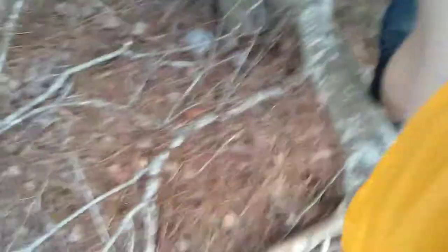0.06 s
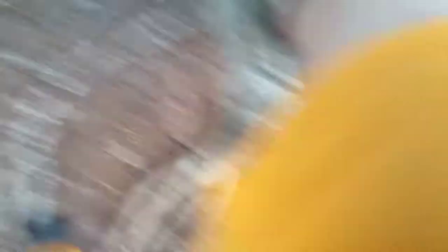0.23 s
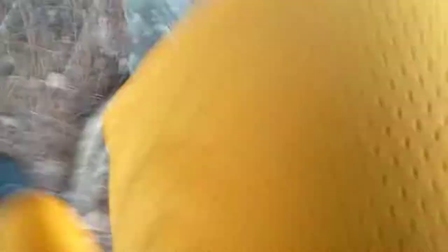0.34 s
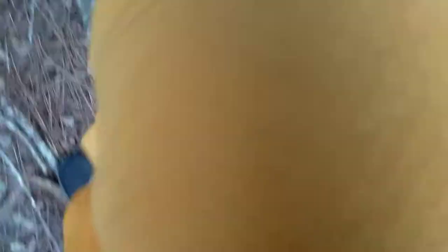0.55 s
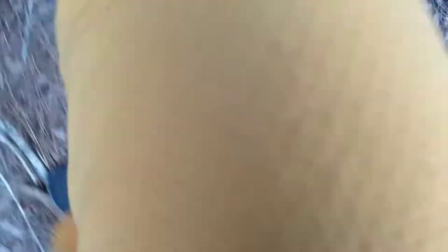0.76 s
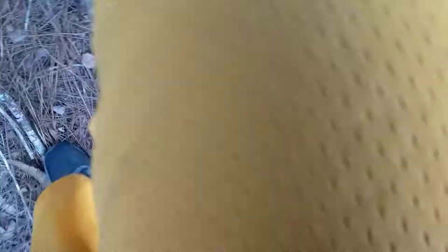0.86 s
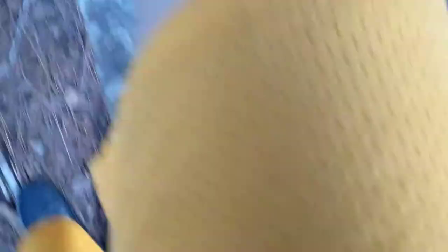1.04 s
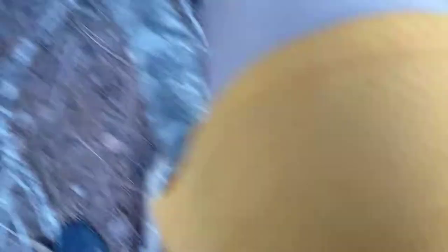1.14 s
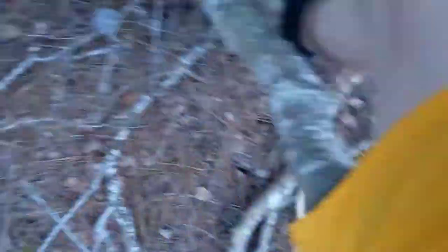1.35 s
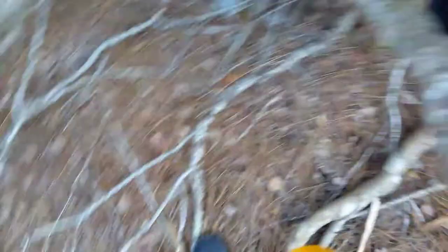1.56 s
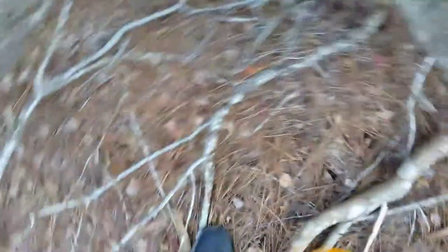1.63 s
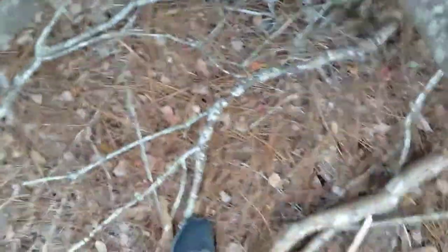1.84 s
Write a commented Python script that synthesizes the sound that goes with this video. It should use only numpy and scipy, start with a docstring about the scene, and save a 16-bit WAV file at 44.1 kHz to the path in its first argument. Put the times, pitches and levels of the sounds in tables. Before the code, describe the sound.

A dry branch is struck very close to the microphone outdoors: a brief swish, a low knock and a dense burst of sharp splintering cracks, then scattered snaps, pattering bits and faint ticks over near silence.

```python
"""Outdoors, on dry needles, a dry branch is struck and splinters close to a small microphone.
It swishes (noise in a gliding resonance), thumps (pushes ringing low resonances) and cracks (noise
bursts with a sharp front). Twigs snap and tick (damped sines) and bits patter (grains over hiss).
Far rumble and rubbing clothing (coloured noise) and a faint hum (a wavering sine) lie below."""
import sys
import numpy as np
from scipy import signal
from scipy.fft import rfft, irfft, next_fast_len
from scipy.io import wavfile
from scipy.ndimage import map_coordinates

SR = 44100
rng = np.random.default_rng(int(sys.argv[2]) if len(sys.argv) > 2 else 0)


def nominal_scale(level):
    """Amplitude ratio for a level in decibels (scalar or array-like)."""
    x = np.asarray(level, float) / 20
    return 10 ** x


def to_wav(s):
    """Save 16-bit WAV."""
    ch = np.atleast_2d(s).T  # columns
    pcm = np.round(np.clip(ch, -1, 1) * 32767)  # PCM
    wavfile.write(sys.argv[1], SR, pcm.astype(np.int16))


N = 83790
T = np.arange(N) / SR


def unit(x):
    """Scaled to rms 1."""
    return x / np.sqrt(np.mean(x ** 2) + 1e-20)


def curve(rows):
    """Straight lines through (seconds, value) rows, one value per sample."""
    return np.interp(T, *np.transpose(rows))


def wobble(rate):
    """A smooth random curve with rate knots a second."""
    knots = rng.standard_normal(int(N * rate / SR) + 4)
    return map_coordinates(knots, [T * rate])


def filtered(x, response):
    """x through a filter given as a complex response of frequency in Hz."""
    size = next_fast_len(N + SR // 2)
    spectrum = rfft(x, size) * response(np.fft.rfftfreq(size, 1 / SR))
    return irfft(spectrum, size)[:N]


def colour(x, points):
    """Minimum-phase filter shaped by (Hz, dB) points, keeping the rms of white noise."""
    size = 2 ** 12
    hz, db = np.transpose(points)
    bins_hz = np.fft.rfftfreq(size, 1 / SR)
    gain = nominal_scale(np.interp(np.log(bins_hz + 1), np.log(hz), db)) + 1e-5
    # folding the cepstrum onto positive times makes the filter causal
    cepstrum = irfft(np.log(gain))
    cepstrum[1:size // 2] *= 2
    cepstrum[size // 2 + 1:] = 0
    pulse = irfft(np.exp(rfft(cepstrum)))
    return signal.fftconvolve(x, pulse / np.linalg.norm(pulse))[:N]


def ring(rows):
    """Damped sines, rising in one cycle, from rows of seconds, level in dB, Hz, t60 in seconds."""
    start, db, hz, t60 = np.transpose(rows)[:, :, None]
    k = np.arange(SR // 20)
    t = k / SR
    wave = nominal_scale(db - 60 * t / t60) * np.sin(2 * np.pi * hz * t) * np.minimum(hz * t, 1)
    place = np.round(start * SR).astype(int) + k
    return np.bincount(place.ravel(), wave.ravel(), N + SR)[:N]


def snaps():
    """Breaking wood: a sharp front, a noise burst and a splintering tail, bright and woody in parallel."""
    # Snaps of wood fibres and twigs. Each row: start in seconds, nominal peak in dB,
    # woody part over the bright part in dB before its fixed lift, woody pitch in Hz, t60 in seconds.
    snap_rows = [(0.2241, -6.5, -5.5, 4700, 0.038), (0.2305, -6, 1, 1800, 0.014),
                 (0.2365, -12, -14.5, 2940, 0.038), (0.2438, -0.5, -0.5, 2800, 0.0086),
                 (0.2499, -14.5, -2, 2800, 0.037), (0.2552, -9, -10.5, 4270, 0.025),
                 (0.264, -4.5, -1, 1740, 0.017), (0.2715, -8, -20, 3563, 0.026),
                 (0.2838, -2, -24.5, 4644, 0.0084), (0.2892, 1, -7, 3165, 0.0066),
                 (0.2913, -8, -4.5, 3000, 0.035), (0.2975, -3, -10, 4980, 0.012),
                 (0.3109, -10, -2, 2830, 0.019), (0.316, 1, -21, 3260, 0.01), (0.3333, 5, -7, 5600, 0.005),
                 (0.3372, -7, 2, 5500, 0.0069), (0.3498, -3.5, -14, 5224, 0.012),
                 (0.3719, 0, -7.5, 5604, 0.0036), (0.374, -22, 2.5, 2500, 0.029),
                 (0.4568, -5.5, -12, 3930, 0.0066), (0.4667, -16.5, -10.5, 4000, 0.024),
                 (0.5032, -25.5, -10, 2000, 0.021), (0.5503, -31.5, -7.5, 5000, 0.044),
                 (0.5643, -35, 2, 3500, 0.02), (0.5729, -27, -8.5, 3840, 0.028),
                 (0.6116, -21, 8.5, 4320, 0.0077), (0.6125, -23, -1.5, 2000, 0.024),
                 (0.6225, -21, 3.5, 4340, 0.0098), (0.7097, -19.5, -14.5, 4900, 0.016),
                 (0.7163, -16.5, -18, 2000, 0.016), (0.7208, -25.5, -9, 3200, 0.045),
                 (0.7413, -25, -9.5, 4800, 0.026), (0.7445, -26.5, -0.5, 5320, 0.0056),
                 (0.8246, -32.5, -9, 4020, 0.025), (0.869, -11.5, -17, 5160, 0.0046),
                 (0.8987, -32.5, -12, 5010, 0.033), (0.9144, -22, -17, 5160, 0.0058),
                 (0.9837, -37.5, -9, 4420, 0.012), (1.147, -34.5, -23, 5980, 0.032),
                 (1.222, -48, 4, 5480, 0.0098), (1.379, -40.5, -13, 2200, 0.042),
                 (1.4225, -39.5, -2, 2766, 0.014), (1.4984, -39.5, -15.5, 5055, 0.034),
                 (1.5288, -37, -20, 5570, 0.028)]
    # Colour of the bright part. Each row: frequency in Hz, relative gain in dB.
    bright_colour = [(2000, -51), (3500, -37.5), (5500, -13.5), (7800, -9.5), (9490, 4.5), (10400, -1.5),
                     (13000, -0.5), (15200, -6.5), (15500, -15.5), (15900, -36)]
    attack_s, tail_attack_s, tail_t60_s = 0.0004, 0.006, 0.22
    tail_db, tail_ref_s = -7.5, 0.062  # tail level after a snap of this t60; shorter snaps leave less
    crest_db, woody_lift_db = 4.5, 1.0  # nominal peak over the bright burst; added to every woody part
    front, sharp_s = 1.5, 0.007  # size of the first break; snaps with a longer t60 start softer
    wood_width_hz = 6850  # bandwidth of each of the two passes of the woody resonance
    t = np.arange(SR // 5) / SR
    bright, woody = np.zeros(N + SR), np.zeros(N + SR)
    for start, db, woody_db, hz, t60 in snap_rows:
        burst = (1 - np.exp(-t / attack_s)) * nominal_scale(-60 * t / max(t60, .003))
        decay_db = tail_db + 20 * np.log10(t60 / tail_ref_s) - 60 * t / tail_t60_s
        tail = nominal_scale(decay_db) * (1 - np.exp(-t / tail_attack_s))
        noise = rng.standard_normal((2, len(t)))
        # every random burst gets the energy of its envelope
        even = np.linalg.norm(burst) / np.linalg.norm(burst * noise, axis=1)[:, None]
        spikes = noise * (burst * even + tail)
        spikes[:, 0] = -front * min(1, sharp_s / t60)
        b, a = signal.iirpeak(hz, hz / wood_width_hz, SR)
        resonant = signal.lfilter(b, a, signal.lfilter(b, a, spikes[1]))
        here = slice(round(start * SR), round(start * SR) + len(t))
        bright[here] += nominal_scale(db - crest_db) * spikes[0]
        woody[here] += nominal_scale(db + woody_db + woody_lift_db) * resonant
    return colour(bright, bright_colour) + woody[:N]


def ticks():
    """Single fibres, twigs and needles tick as short damped sines."""
    # Each row: start in seconds, nominal peak in dB, pitch in Hz, t60 in seconds.
    tick_rows = [(.1281, -32, 9290, 0.0028), (.1815, -36, 9060, 0.0027), (.2662, -7, 13000, 0.0027),
                 (.4028, -18.5, 14520, .01), (.6128, -24.5, 2795, 0.011), (.9607, -44.5, 3160, 0.0037),
                 (1.211, -53.5, 3610, 0.026), (1.379, -60.5, 1600, 0.072), (1.384, -63, 1111, 0.073),
                 (1.424, -53, 900, 0.021), (1.5288, -30.5, 7860, 0.0046), (1.5476, -42, 11880, .002),
                 (1.5862, -35, 9880, 0.002005), (1.6063, -40, 10040, .002), (1.729, -44, 7890, 0.0029),
                 (1.7955, -39, 8570, 0.00197)]
    return ring(tick_rows)


def thumps():
    """The branch knocks the ground and the stump: rounded pushes ring its broad low resonances."""
    # Each row: start in seconds, height of the push in dB, time from start to full push in seconds.
    knocks = [(0.2277, -8, 0.00046), (0.23, -10, 0.0015), (0.2355, -6.5, 0.00085), (0.2428, -2, 0.00058),
              (0.2489, -5.5, 0.0008), (0.264, -8.5, 0.00071), (0.27, -10, 0.0028), (0.2903, -5, 0.00082),
              (0.2966, -7, .0005), (.315, -14, .0003), (0.379, -20.5, 0.00014)]
    # Resonances of the branch. Each row: centre in Hz, width in Hz, gain at the centre in dB.
    modes = [(81.6, 19, 4), (127, 34, -4), (205, 59, -13), (312, 250, -8), (424, 82, -4), (578, 130, -5),
             (817, 99, 1.5), (1010, 270, 0), (1407, 160, -4.5)]
    push = sum(nominal_scale(db) * np.exp(-((T - start - rise) / rise) ** 2 * 2) for start, db, rise in knocks)

    def branch(f):
        """Sum of band-pass resonances, turned over in sign."""
        return -sum(nominal_scale(db) * 1j * f * width / (hz * hz - f * f + 1j * f * width)
                    for hz, width, db in modes)

    return filtered(push, branch)


def swishes():
    """Air whistles round moving wood: noise in a gliding resonance that swells and fades."""
    # Each row: start in seconds, length in seconds, level in dB before the swell,
    # first pitch in Hz, last pitch in Hz, width in Hz.
    swish_rows = [(.17, .075, -42, 600, 1150, 300), (1.575, .08, -64, 2080, 1800, 400)]
    out = np.zeros(N)
    for start, length, db, from_hz, to_hz, width in swish_rows:
        progress = np.clip((T - start) / length, 0, 1)
        pole = [1, -np.exp(-np.pi * width / SR)]
        slow = signal.lfilter([1], np.convolve(pole, pole), rng.standard_normal((2, N)))
        phase = 2 * np.pi * np.cumsum(from_hz + (to_hz - from_hz) * progress) / SR
        whistle = unit(slow[0] * np.sin(phase) + slow[1] * np.cos(phase))
        out += nominal_scale(db) * np.sin(np.pi * progress ** 1.5) ** 2 * whistle
    return out


def patter_level():
    """Amplitude of the falling bits: a drifting base with short decaying showers added."""
    # Bits on dry needles. Each row: time in seconds, level in dB.
    base = [(0, -52), (.03, -69), (.16, -58.5), (.22, -42), (.39, -41), (.44, -56.5), (.7, -78.5),
            (1.0, -60), (1.3, -69.5), (1.66, -68.5), (1.72, -70), (1.9, -53)]
    # Showers of bits on top. Each row: start in seconds, level in dB before the attack, t60 in seconds.
    showers = [(0.085, -59, 0.31), (0.45, -22, 0.11), (0.535, -35, 0.067), (0.673, -48, 0.092),
               (0.78, -43, 0.15), (.93, -54.5, 0.19), (1.033, -47, 0.22), (1.133, -54.5, 0.11),
               (1.192, -55.5, 0.14), (1.36, -59.5, 0.19), (1.594, -56, 0.12), (1.723, -58, 0.34)]
    attack_s = 0.0025
    level = nominal_scale(curve(base))
    for start, db, t60 in showers:
        t = np.maximum(T - start, 0)
        level = level + (1 - np.exp(-t / attack_s)) * nominal_scale(db - 60 * t / t60)
    return level


def stray_ticks():
    """Chance ticks as damped sines, spread over an octave of pitch."""
    per_s, middle_hz, t60_cycles = 220, 10000, 22
    least_db, spread_db = 1.5, 12  # relative to the patter; most ticks lie near the least
    when, pitch, size = rng.random((round(per_s * N / SR), 3)).T
    hz = middle_hz * 2 ** (pitch - .5)
    return ring(np.c_[when * N / SR, least_db + spread_db * size ** 2, hz, t60_cycles / hz])


def patter():
    """Bits land on dry needles: dense tiny grains over hiss, in clumps and showers, with stray ticks."""
    # Colour of the needles. Each row: frequency in Hz, relative gain in dB.
    needle_colour = [(500, -27.5), (1100, -19), (2480, -21.5), (3360, -23), (4920, -14.5), (7800, -12.5),
                     (9500, 0), (11000, -7.5), (14900, -9.5), (15500, -25), (15900, -43.5)]
    # Gain of the top treble. Each row: time in seconds, gain in dB.
    sparkle = [(1.4, 1), (1.8, -9.5)]
    grains_per_s, grain_spread_db = 3500, 3.5
    hiss_share = .55  # of amplitude; the grains make up the rest
    hits = (rng.random(N) < grains_per_s / SR) * rng.standard_normal(N)
    grains = hits * nominal_scale(grain_spread_db * np.minimum(rng.exponential(size=N), 4))
    mixed = hiss_share * rng.standard_normal(N) + (1 - hiss_share) * unit(grains)
    bed = colour(unit(mixed), needle_colour)
    # fades in from 10.5 to 12.5 kHz
    top = filtered(bed, lambda hz: np.clip((hz - 10500) / 2000, 0, 1))
    level = patter_level()
    stray = stray_ticks()
    clumps = nominal_scale(1.5 * wobble(40) + 1.5 * wobble(200))
    return level * (clumps * (bed + (nominal_scale(curve(sparkle)) - 1) * top) + stray)


def clothing():
    """Clothing rubs: low coloured noise with a fluttering level."""
    # Each row: time in seconds, level in dB before the flutter.
    rub_level = [(0, -73.5), (.15, -71.5), (.35, -49.5), (.46, -63.5), (.57, -51.5), (.62, -71), (.8, -86),
                 (1.64, -82), (1.7, -73), (1.735, -54.5), (1.79, -61), (1.86, -62.5), (1.9, -60)]
    # Each row: frequency in Hz, relative gain in dB.
    rub_colour = [(100, -30), (200, -8), (320, -2), (450, 0), (600, -7), (900, -20), (1500, -34),
                  (2500, -60)]
    return nominal_scale(curve(rub_level) + 2 * wobble(60)) * unit(colour(rng.standard_normal(N), rub_colour))


def rumble():
    """Rumble from far off: deep coloured noise with a slowly wandering level."""
    # Each row: time in seconds, level in dB before the wander.
    rumble_level = [(0, -57), (.2, -58.5), (.45, -63), (.8, -71.5), (1.35, -74.5), (1.55, -64.5),
                    (1.9, -60.5)]
    # Each row: frequency in Hz, relative gain in dB.
    far_colour = [(12, -68), (20, -40), (54, -6), (90, -3), (114, 0), (384, -28), (721, -23.5),
                  (947, -23.5), (1380, -26), (3000, -40.5), (3900, -50), (6600, -120)]
    return nominal_scale(curve(rumble_level) + 1.5 * wobble(5.8)) * unit(colour(rng.standard_normal(N), far_colour))


def hum():
    """A faint sine whose level and phase waver."""
    hum_hz, hum_db = 119, -73  # both before the wavering
    return nominal_scale(hum_db + 2 * wobble(8)) * np.sin(2 * np.pi * hum_hz * T + .5 * wobble(10))


def scene():
    """All sources at one microphone."""
    wood = snaps() + ticks() + thumps() + swishes()
    background = clothing() + rumble() + hum()
    return (wood + patter() + background)[None]


def band_limit(x):
    """A steep low-pass at the top of the band."""
    return signal.sosfilt(signal.butter(12, 16640, fs=SR, output="sos"), x)


def record(dry):
    """The loudest peaks bend softly towards full scale."""
    soft = dry / (1 + np.abs(dry) ** 6) ** (1 / 6)
    return band_limit(soft)


dry = scene()
out = record(dry)
to_wav(out)
```